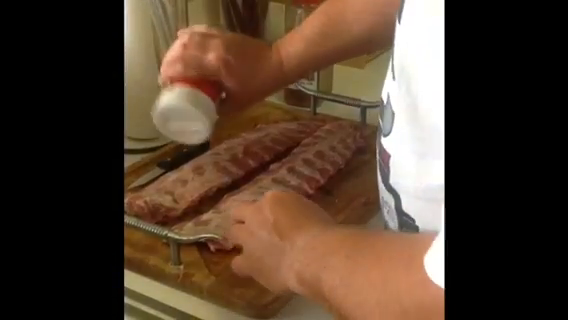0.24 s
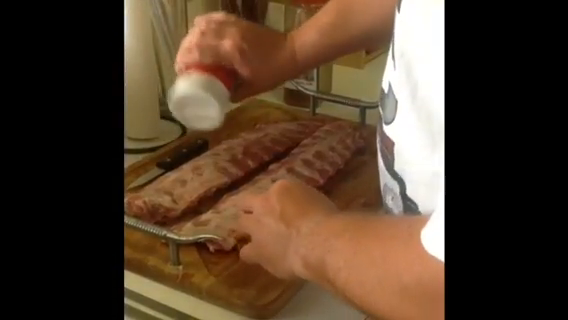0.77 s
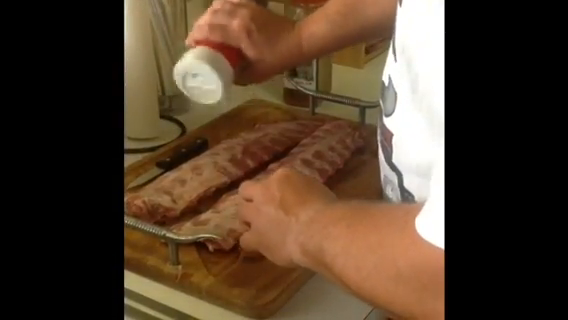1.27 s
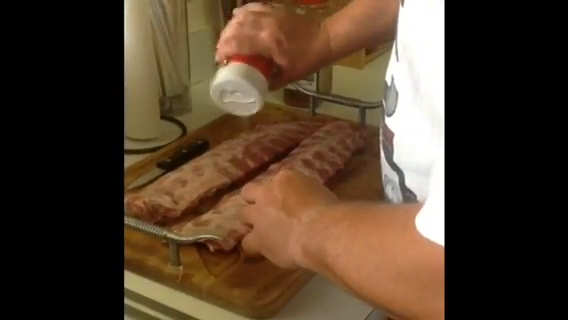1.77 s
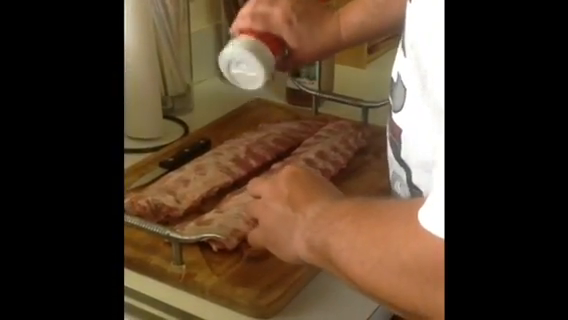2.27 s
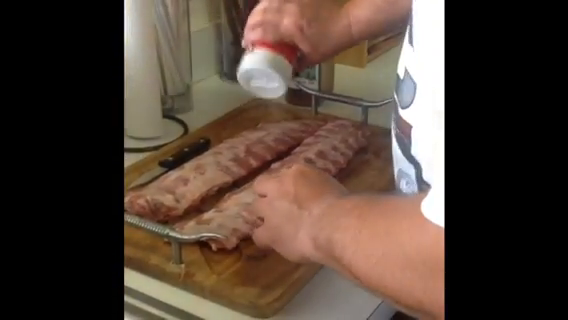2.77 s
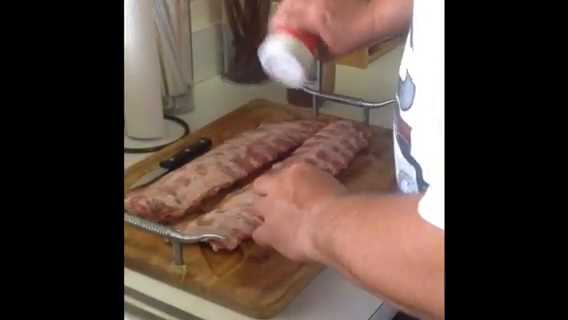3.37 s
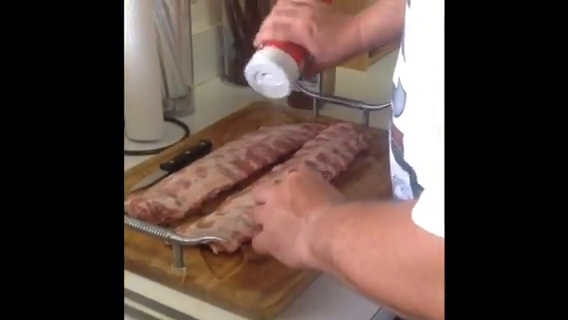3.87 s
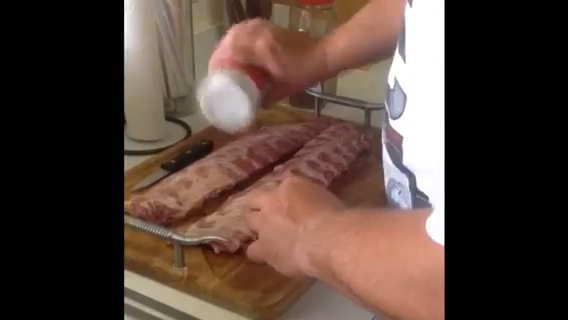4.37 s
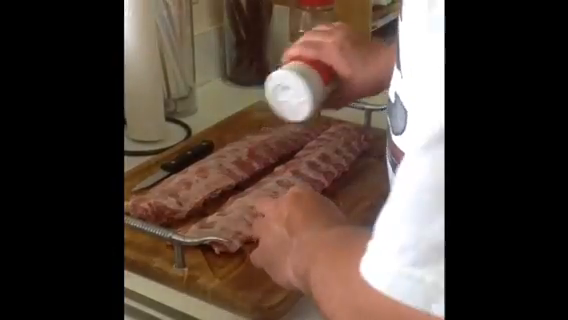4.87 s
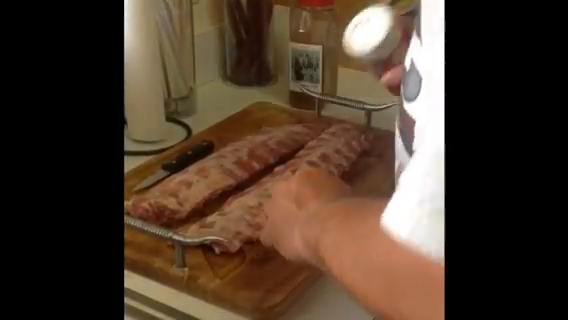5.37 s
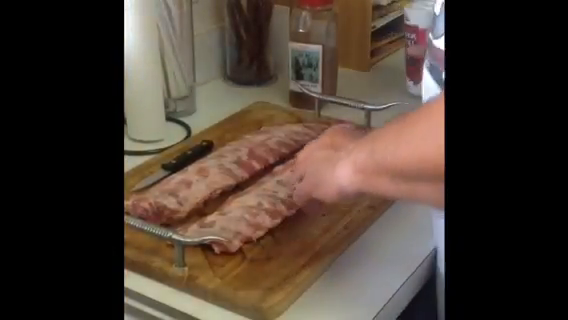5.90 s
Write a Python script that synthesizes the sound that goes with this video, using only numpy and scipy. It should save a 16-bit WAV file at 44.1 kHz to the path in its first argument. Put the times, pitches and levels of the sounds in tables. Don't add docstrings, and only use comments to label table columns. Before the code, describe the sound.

Fine salt swishes rapidly back and forth in a plastic shaker, then a hollow bump and a hard knock on the counter over a faint fridge hum.

```python
import sys
import numpy as np
from scipy import signal
from scipy.fft import rfft, irfft, next_fast_len
from scipy.io import wavfile
from scipy.ndimage import uniform_filter1d

SR = 44100
rng = np.random.default_rng(int(sys.argv[2]) if len(sys.argv) > 2 else 0)


def gain_from_decibels(decibels):
    exponent = np.asarray(decibels, float) / 20
    return 10 ** exponent


def unload_audio(sound):
    columns = np.transpose(np.atleast_2d(sound))
    steps = np.round(np.clip(columns, -1, 1) * 32767)
    wavfile.write(sys.argv[1], SR, steps.astype(np.int16))


N = 270763


def evened(x):
    return x / np.sqrt(np.mean(x ** 2) + 1e-20)


def read(points, hz):
    f, value = np.transpose(points)
    return np.interp(np.log(hz + 1), np.log(f + 1), value)


def coloured(x, points):
    size = next_fast_len(len(x))
    gain = gain_from_decibels(read(points, np.fft.rfftfreq(size, 1 / SR)))
    return irfft(rfft(x, size) * gain, size)[:len(x)]


def resonate(x, hz, width):
    r = np.exp(-np.pi * width / SR)
    pole = r * np.exp(2j * np.pi * hz / SR)
    return 2 * signal.lfilter([1 - r], [1, -pole], x).real


def burst(s, db, length):
    since = np.maximum(np.arange(N) / SR - s, 0)
    return gain_from_decibels(db) * (1 - np.exp(-since / 0.00013)) * np.exp(-since / length)


# f/Hz, level/dB per Hz
FAN_AIR = [(30, -30), (60, -16.5), (100, -29), (140, -12), (190, -5.5), (290, -2), (450, -9), (800, -13.5),
           (1100, -17), (2000, -23), (4000, -26), (15000, -31)]


def fan_air():
    return gain_from_decibels(-52.5) * evened(coloured(rng.standard_normal(N), FAN_AIR))


# f/Hz, width/Hz, level/dB
CASING = [(192.7, 20, -61.5), (258.4, 25, -64.5), (292, 11.3, -62.5), (317.4, 9.4, -62.5),
          (566.6, 39, -66.5), (620.5, 15.4, -65.5), (788, 40, -70.5), (870, 54, -71)]


def casing_drones():
    shake = rng.standard_normal(N)
    drone = 0
    for hz, width, db in CASING:
        drone = drone + gain_from_decibels(db) * evened(resonate(resonate(shake, hz, width), hz, width))
    return drone


# multiple of shaft rate, level/dB
SHAFT_ORDERS = [(4, -64), (6, -64.5), (7, -69), (8, -62.5), (9, -63.5), (11, -72), (12, -71), (13, -91),
                (14, -67.5), (16, -78), (17, -96)]
# f/Hz, level/dB
STEADY_TONES = [(120, -71.5), (199, -56.5)]


def compressor():
    shaft_hz, waver_hz = 58.1, 0.094
    waver = evened(uniform_filter1d(uniform_filter1d(rng.standard_normal(N), 9000), 9000))
    turn = 2 * np.pi * np.cumsum(shaft_hz + waver_hz * waver) / SR
    sound = np.zeros(N)
    for order, db in SHAFT_ORDERS:
        sound += gain_from_decibels(db) * np.sqrt(2) * np.cos(order * turn + 2 * np.pi * rng.random())
    for hz, db in STEADY_TONES:
        sound += gain_from_decibels(db) * np.sqrt(2) * np.cos(turn * hz / shaft_hz)
    return sound


def fridge():
    return fan_air() + casing_drones() + compressor()


# f/Hz, T60/s
REVERBERATION = [(150, 0.34), (500, 0.34), (1500, 0.37), (4000, 0.39), (8000, 0.23), (14000, 0.2)]


def kitchen(x):
    taps = np.zeros(SR // 2)
    at = np.arange(150, len(taps) - 20, 20)
    taps[at + rng.integers(0, 20, len(at))] = rng.choice([-1., 1.], len(at))
    hz, t, z = signal.stft(taps, SR, nperseg=256)
    decay = gain_from_decibels(-60 * t / read(REVERBERATION, hz)[:, None])
    tail = signal.istft(z * decay, SR, nperseg=256)[1]
    return signal.fftconvolve(x, tail / np.linalg.norm(tail))[:N]


def struck(hits, modes, crack, rise_cycles, echo_db):
    t = np.arange(SR // 3) / SR
    body = np.zeros(len(t))
    for hz, db, t60 in modes:
        build_up = np.tanh(hz * t / rise_cycles)
        body += gain_from_decibels(db - 60 * t / t60) * build_up * np.sin(2 * np.pi * hz * t)
    force, snap, cracks = np.zeros(N), np.zeros(N), np.zeros(N)
    rough = rng.standard_normal(N)
    for s, ring_db, crack_db, length, dull_db in hits:
        at = round(s * SR)
        force[at] = gain_from_decibels(ring_db)
        snap[at] = gain_from_decibels(crack_db) * np.sqrt(length * SR)
        colour = [(hz, db - dull_db * np.log2(hz / 2000)) for hz, db in crack]
        cracks += burst(s, crack_db, length) * evened(coloured(rough, colour))
    ring = signal.oaconvolve(force, body)[:N]
    far_snap = coloured(snap, crack)
    far_snap *= np.linalg.norm(snap) / np.linalg.norm(far_snap)
    ring_echo, snap_echo = gain_from_decibels(echo_db)
    return ring + cracks, ring_echo * ring + snap_echo * far_snap


# t/s, ring level/dB, crack level/dB, crack decay/s, dulling/dB per octave
BUMP_CONTACTS = [
    (5.3209, 2.5, -29.5, 0.0045, -2),
    (5.3266, -7, -32, 0.0029, 14),
]
# f/Hz, level/dB, T60/s
CABINET_MODES = [(267, -30, .19), (511, -33, .11), (2480, -36, .06), (3010, -28, .02), (3230, -30, .015),
                 (183, -42, .15), (353, -46, .08), (640, -40, .05), (850, -38, .02), (1000, -40, .02),
                 (2830, -36, .02)]
# f/Hz, level/dB per Hz
CABINET_NOISE = [(150, -18), (600, 2), (1000, 5), (1500, 1), (2300, -3), (3000, -5), (3700, -7), (5300, -6),
                 (8500, -15), (12000, -11), (16000, -22)]


def cabinet_bump():
    return struck(BUMP_CONTACTS, CABINET_MODES, CABINET_NOISE, rise_cycles=1.5, echo_db=(-13, -8))


# t/s, ring level/dB, crack level/dB, crack decay/s, dulling/dB per octave
KNOCK_CONTACTS = [
    (5.9902, 0, -22.5, 0.0064, -1.5),
    (5.9948, -37, -32, 0.0015, -2.5),
    (6.009, -33, -38, 0.0054, 17),
    (6.0386, -23, -27.5, 0.0055, 0),
]
# f/Hz, level/dB, T60/s
COUNTER_MODES = [(205.7, -31, 0.24), (267, -29.5, 0.21), (354, -36, 0.14), (518, -34, 0.15),
                 (672, -19.5, 0.072), (693, -19, 0.11), (840, -24, 0.074), (884, -11.5, 0.044),
                 (983, -4, 0.018), (1067, -8.5, 0.024), (1180, -14.5, 0.041), (1470, -23, 0.014),
                 (1683, -11, 0.011), (1855, -10, 0.012), (2230, -18.5, 0.017)]
# f/Hz, level/dB per Hz
COUNTER_NOISE = [(150, -12.5), (400, 2.5), (800, -6.5), (1300, -6), (2200, -11.5), (3000, -12),
                 (4700, -19.5), (6000, -17), (8500, -18), (12000, -22), (15500, -31)]


def counter_knock():
    return struck(KNOCK_CONTACTS, COUNTER_MODES, COUNTER_NOISE, rise_cycles=2.6, echo_db=(-4, -3))


# t/s, level/dB, decay/s
JOLT_TIMES = [
    (5.908, -46, .005),
    (6.116, -56, .004),
]


def jolts():
    spray = sum(burst(*tick) for tick in JOLT_TIMES)
    colour = [(1500, -16.5), (3500, 0), (8000, 2), (12000, -6)]  # f/Hz, level/dB
    return spray * evened(coloured(rng.standard_normal(N), colour))


def patchy(x, patch_db):
    z = signal.stft(x, nperseg=256)[2]
    patches = uniform_filter1d(rng.standard_normal(z.shape), size=3, axis=0)
    patches = uniform_filter1d(patches, size=14, axis=1)
    return evened(signal.istft(z * gain_from_decibels(patch_db * evened(patches)), nperseg=256)[1][:N])


# down peak t/s, hiss level/dB, return peak t/s, hiss level/dB
SHAKE_PEAKS = [(0.014, -39, 0.096, -37), (0.202, -36.5, 0.294, -34), (0.395, -37.5, 0.481, -34),
               (0.581, -40.5, 0.654, -39.5), (0.773, -40, 0.879, -34), (0.972, -35.5, 1.072, -33),
               (1.161, -39, 1.244, -37), (1.353, -35.5, 1.457, -32.5), (1.551, -33.5, 1.658, -31.5),
               (1.753, -35, 1.849, -33.5), (1.963, -36.5, 2.046, -35), (2.148, -36, 2.244, -33),
               (2.348, -35.5, 2.44, -33.5), (2.548, -35.5, 2.64, -32.5), (2.735, -41.5, 2.814, -39.5),
               (2.935, -37, 3.022, -34), (3.125, -38.5, 3.2, -37.5), (3.299, -43, 3.391, -39.5),
               (3.49, -35, 3.571, -31.5), (3.673, -41, 3.752, -40.5), (3.861, -34.5, 3.957, -33.5),
               (4.061, -36, 4.131, -33), (4.232, -35, 4.301, -35.5), (4.411, -32, 4.5, -30),
               (4.597, -36, 4.66, -33), (4.773, -35, 4.851, -36.5), (4.951, -35.5, 5.033, -33.5),
               (5.142, -30, 5.205, -36.5)]
# peak t/s, hiss level/dB, rise/dB per s, fall/dB per s, wall re hiss/dB
SLOW_SLIDES = [
    (5.283, -46, 360.0, 99, -3),
    (5.568, -47, 174, 180.0, -1.5),
    (5.755, -36, 99, 188, -34),
]


def strokes():
    down_s, down_db, back_s, back_db = np.transpose(SHAKE_PEAKS)
    hurry = (0.085 / (back_s - down_s)) ** 0.64
    hard_db = -36
    luck_down, luck_back = 4 * rng.standard_normal((len(SHAKE_PEAKS), 2)).T

    def wall(db, mean_db, luck):
        return mean_db - 0.4 * (db - hard_db) + luck

    down_rise = 360 * (1 + 0.008 * (down_db - hard_db))
    down = down_s, down_db, down_rise, 290 * hurry, wall(down_db, -13.5, luck_down)
    back_fall = np.full(len(back_s), 308.0)
    back = back_s, back_db, 335 * hurry, back_fall, wall(back_db, -20, luck_back)
    return np.hstack([down, back, np.transpose(SLOW_SLIDES)])


# f/Hz, level/dB per Hz
GRAIN_SPECTRUM = [(900, -22), (1700, -14), (2600, -9.5), (4200, -9), (7000, -5), (10300, -1), (12800, -3.5),
                  (15300, -4.5)]
# f/Hz, width/Hz, level/dB
WALL_MODES = [(2050, 290, -3), (2320, 550, 4), (2673, 60, 13), (3160, 500, 4.5), (3620, 310, 2)]


def salt():
    grains_per_s, spread_db = 30000, 1.5
    step = 64
    t = np.arange(N // step + 2) * step / SR
    s, db, rise, fall, wall_db = strokes()

    def swell(since, steep, round_db):
        slope = steep * np.where(since < 0, rise, fall)
        return gain_from_decibels(round_db - np.hypot(slope * since, round_db)) ** 2

    def envelope(power):
        return np.interp(np.arange(N) / SR, t, np.sqrt(power.sum(1)))

    since = t[:, None] - s
    hiss = envelope(gain_from_decibels(db - 2.5) ** 2 * swell(since, 1.33, 9.05))
    ring = envelope(gain_from_decibels(db - 7.5 + wall_db) ** 2 * swell(since + 0.0033, 1.5, 7.6))
    chance, size, sign = rng.random((3, N))
    strengths = gain_from_decibels(-spread_db * np.log(size + 0.0028))
    grains = (chance < grains_per_s / SR) * strengths * np.sign(sign - .5)
    wall = sum(gain_from_decibels(d) * resonate(resonate(grains, f, w), f, w) for f, w, d in WALL_MODES)
    fine_hiss = hiss * patchy(coloured(grains, GRAIN_SPECTRUM), patch_db=0.87)
    return fine_hiss + gain_from_decibels(-6.0) * ring * patchy(wall, patch_db=5.0)


def scene():
    hum = fridge()
    bump, far_bump = cabinet_bump()
    knock, far_knock = counter_knock()
    shaker = salt() + jolts()
    reflections = kitchen(gain_from_decibels(-11.5) * shaker + far_knock + far_bump)
    mix = shaker + knock + bump + reflections + hum
    return np.array([mix, mix])


def low_pass(x):
    return signal.sosfilt(signal.butter(12, 16470, fs=SR, output="sos"), x)


def record(dry):
    bass_cut = signal.butter(3, 115, "highpass", fs=SR, output="sos")
    thin = signal.sosfilt(bass_cut, dry)
    treble_cut = signal.firwin(801, 15380, window=("kaiser", 9), fs=SR)
    finished = signal.oaconvolve(thin, treble_cut[None], "same")
    return low_pass(finished)


dry = scene()
out = record(dry)
unload_audio(out)
```